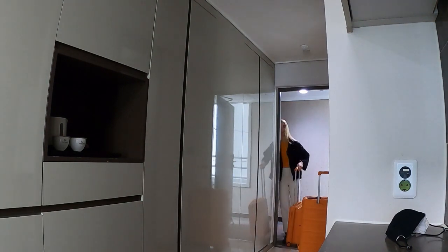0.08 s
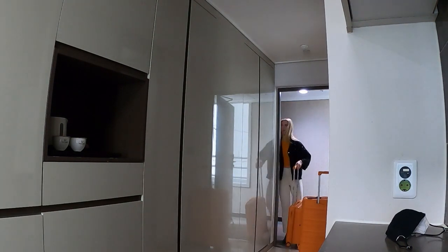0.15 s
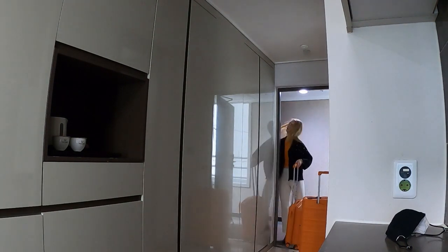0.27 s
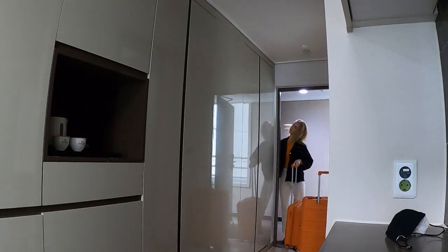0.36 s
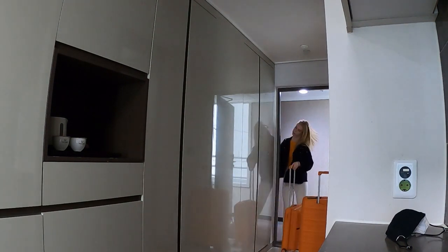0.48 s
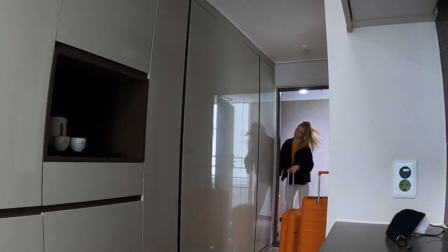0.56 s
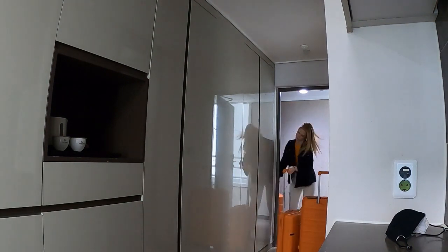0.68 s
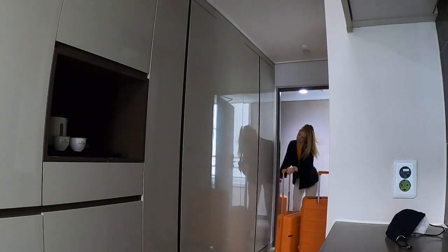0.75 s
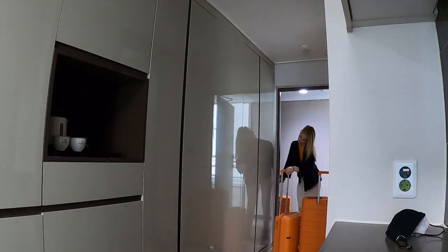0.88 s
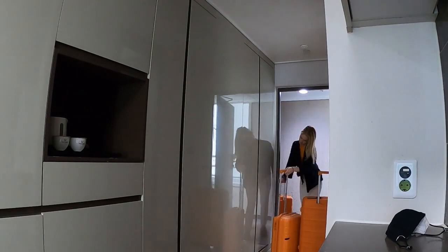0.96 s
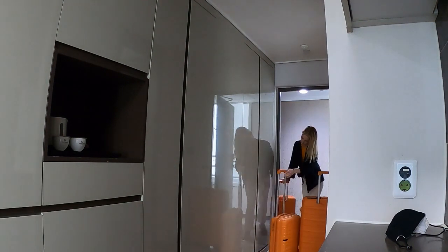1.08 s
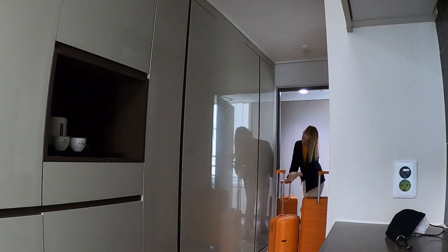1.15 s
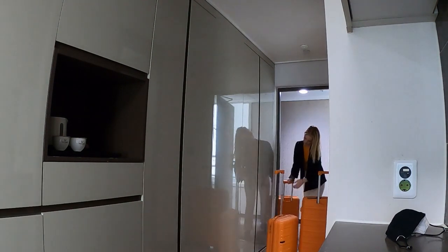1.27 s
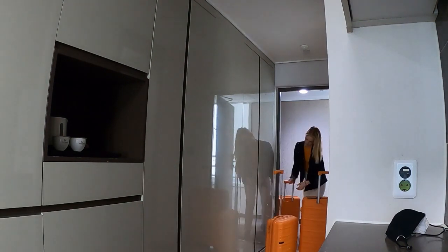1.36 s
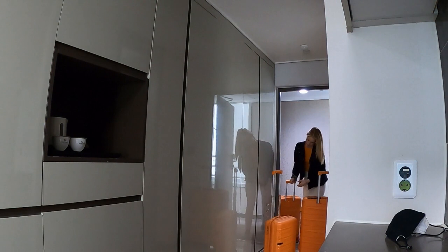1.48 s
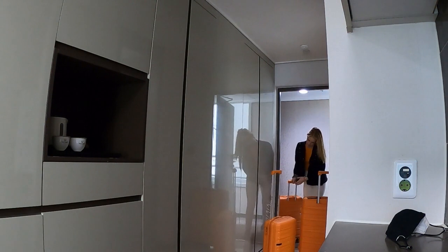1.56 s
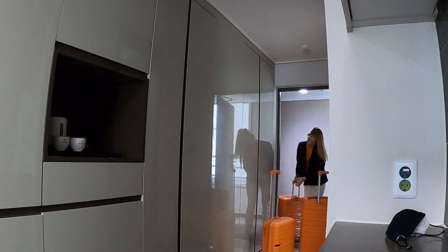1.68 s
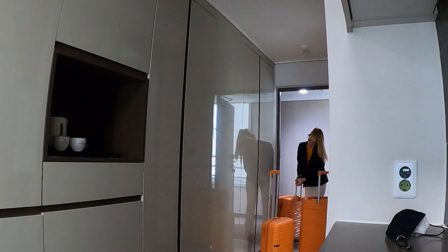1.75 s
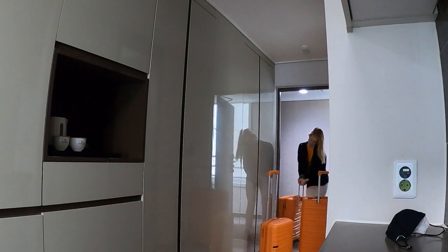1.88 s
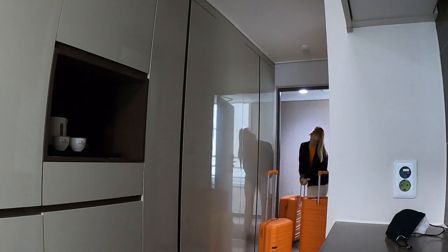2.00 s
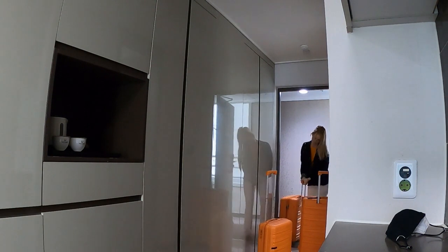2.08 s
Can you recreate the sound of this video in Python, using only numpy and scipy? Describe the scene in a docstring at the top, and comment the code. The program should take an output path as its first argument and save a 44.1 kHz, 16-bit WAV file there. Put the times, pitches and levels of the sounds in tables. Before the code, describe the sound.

Hard-shell suitcases clatter twice over a door sill, then roll on quietly with soft steps.

```python
"""A small, bare hallway, into which hard-shell suitcases are pulled over a door sill.
The wheels drop off the sill in two clattering bangs, and a handle clacks home: each impact makes
loose fittings rattle and excites the resonances of the hollow shells and of the room.
Then the cases roll on quietly, with soft steps, light knocks, zip clicks and a swish of cloth."""
import sys
import numpy as np
from scipy import signal
from scipy.fft import rfft, irfft
from scipy.io import wavfile
from scipy.ndimage import uniform_filter1d

SR = 44100
rng = np.random.default_rng(int(sys.argv[2]) if len(sys.argv) > 2 else 0)


def log_audio(samples):
    """Write samples as a 16-bit WAV file to the path given in sys.argv[1]."""
    # one column per channel
    frames = np.atleast_2d(samples).T
    # limit to full scale, then quantise
    limited = np.clip(frames, -1, 1)
    pcm = np.round(limited * 32767).astype(np.int16)
    wavfile.write(sys.argv[1], SR, pcm)


N = 92610
T = np.arange(N) / SR
RESPONSE_SAMPLES = 2 ** 15
SIDES = np.array([[1], [-1]])   # a side signal adds on the left and subtracts on the right

# Impacts of the first bang, the second bang and the handle.
# Each row: start in seconds, then relative levels of thump, knock and clack in dB.
HEAVY_IMPACTS = [(.2005, -10, -15.5, -3.5), (.2131, -5, -16, -5), (.2235, 2, 2, -3.5),
                 (.2443, -10, -2, -13.5), (.2595, -7, -7.5, -10), (.2708, -5, -5, -1.5),
                 (.2855, -3.5, -4.5, -2)]
LIGHT_IMPACTS = [(.6855, -10, -19.5, -16.5), (.6925, -1, -5.5, -3.5), (.7012, 2.5, -1.5, 0.5),
                 (.7125, 2.5, 1, -4.5), (.7335, -3, -3.5, -4), (.7495, -10, -15, -7.5)]
HANDLE_IMPACTS = [(.792, -29, -12, -5.5), (.804, -4.5, 0.5, -0.5), (.8155, -8.5, -3, -7),
                  (.852, -9.5, -8, -12.5), (.89, -19.5, -17, -10)]


def from_db(db):
    """Amplitude grows tenfold for every 20 dB."""
    return 10 ** (np.asarray(db) / 20)


def rms_one(x):
    """Normalisation to unit mean power."""
    return x / np.sqrt(np.mean(x ** 2) + 1e-20)


def at_hz(points, hz):
    """Interpolation along a logarithmic frequency axis."""
    frequencies, values = np.transpose(points)
    return np.interp(np.log(hz), np.log(frequencies), values)


def level(curve):
    """Amplitude envelope through points of time in seconds and level in dB."""
    return from_db(np.interp(T, *np.transpose(curve)))


def coloured(x, spectrum, size=4096):
    """Minimum-phase filtering: folding the cepstrum makes the response causal."""
    hz = np.maximum(np.arange(size // 2 + 1) * SR / size, 1)
    cepstrum = irfft(np.log(from_db(at_hz(spectrum, hz))))
    cepstrum[1:size // 2] *= 2
    cepstrum[size // 2 + 1:] = 0
    return signal.fftconvolve(x, irfft(np.exp(rfft(cepstrum))))[:len(x)]


def hiss(spectrum):
    """Filtered Gaussian noise of unit power."""
    return rms_one(coloured(rng.standard_normal(N), spectrum))


def add(track, start_s, sound):
    """Superposition: a sound adds to the track from its start time on."""
    i = int(max(start_s, 0) * SR)
    track[i:i + len(sound)] += sound[:max(N - i, 0)]


def mode(x, hz, t60):
    """Damped oscillator: a unit impulse rings as a sine that falls 60 dB in t60 seconds."""
    radius = from_db(-60 / (t60 * SR))
    angle = 2 * np.pi * hz / SR
    return signal.lfilter([0, np.sin(angle)], [1, -2 * radius * np.cos(angle), radius ** 2], x + 1e-18)


def ringing(strikes, modes):
    """Modal superposition: every strike excites all the modes, scaled by its first level."""
    impulses = np.zeros(N)
    for start, db, *_ in strikes:
        add(impulses, start, from_db([db]))
    return sum(from_db(db) * mode(impulses, hz, t60) for hz, db, t60 in modes)


def contact(size=4096, per_s=900, decay_s=.0085, chatter_db=-4.5):
    """Contact chatter: one impulse, then dying random rebounds of loose parts, with unit energy in all."""
    rebounds = (rng.random(size) < per_s / SR) * rng.standard_normal(size)
    force = rebounds * np.exp(-T[:size] / decay_s) * from_db(chatter_db)
    force[0] = 1
    return force / np.sqrt(np.sum(force ** 2))


def scuff(size=4096, per_s=2300, decay_s=.019):
    """Stick-slip friction: a light touch is a dying run of tiny slips, with unit energy in all."""
    slips = (rng.random(size) < per_s / SR) * rng.choice([-1, 1], size)
    force = slips * np.exp(-T[:size] / decay_s)
    return force / np.sqrt(np.sum(force ** 2) + 1e-18)


def blows(impacts, spectrum, touch=contact):
    """Source and filter: each contact has its own balance of three bands; the case colours them all."""
    bands_hz = [200, 830, 3070]   # centres of thump, knock and clack
    force = np.zeros(N)
    for start, *levels_db in impacts:
        add(force, start, coloured(touch(), list(zip(bands_hz, levels_db))))
    return coloured(force, spectrum)


def taps(contacts, spectrum):
    """Source and filter: rattling contacts of different strengths share one spectrum."""
    force = np.zeros(N)
    for start, db in contacts:
        add(force, start, from_db(db) * contact())
    return coloured(force, spectrum)


def hallway_tone(level_db=-58):
    """Steady background noise: an independent side signal makes the channels partly coherent."""
    # Spectrum, and further filter for the side signal. Each row: frequency in Hz, gain in dB.
    spectrum = [(20, -9), (60, -1), (140, 4), (400, -12), (1000, -14), (3000, -25.5), (9000, -40.5),
                (15000, -76.5)]
    side_filter = [(30, 0), (125, -2.5), (1000, -8.5), (6000, -3.5)]
    return from_db(level_db) * (hiss(spectrum) + coloured(hiss(spectrum), side_filter) * SIDES)


def standing_waves():
    """Impulse response of the hallway's low normal modes, summed with alternating signs."""
    # Each row: frequency in Hz, gain at resonance in dB, 60 dB decay time in seconds.
    room_modes = [(82.4, 1, 0.33), (108.5, 6, 0.39), (140.7, 6, 0.45), (161.2, 5.5, 0.46),
                  (193.6, 10.5, 0.27), (257.6, 2.5, 0.25), (290.1, 5.5, 0.5), (303.7, 0.5, 0.12),
                  (344.2, 1.5, 0.12), (384.2, -7, 0.12), (413.3, 5, 0.36), (430, 1.5, 0.4),
                  (479.5, 4.5, 0.69)]
    impulse = signal.unit_impulse(RESPONSE_SAMPLES)
    response = 0
    for k, (hz, db, t60) in enumerate(room_modes):
        resonant_gain = t60 * SR / (2 * np.log(1000))
        response += (-1) ** k * from_db(db) / resonant_gain * mode(impulse, hz, t60)
    return response


def power_decay(energy_db, t60):
    """Exponential decay of reverberant power with a given total energy."""
    power = from_db(-120 * T[:RESPONSE_SAMPLES] / t60)
    return from_db(energy_db) ** 2 * power / power.sum()


def hallway(bands=20):
    """Stereo impulse response from one spot: direct sound, early reflections and a diffuse tail."""
    # Each row: frequency in Hz, reverberation time in seconds.
    reverb_times = [(60, 0.74), (160, 0.2), (420, 0.68), (1100, 0.5257), (2900, 0.3672), (7700, 0.35),
                    (14000, 0.5)]
    # Strength of the reflections, and of their side signal. Each row: frequency in Hz, gain in dB.
    scattering = [(70, -6.5), (150, -2.5), (350, -2), (600, 0)]
    side_gains = [(30, -9), (125, -51), (250, -29), (500, -15), (1000, -12.5), (2000, -7), (4000, -5.5),
                  (8000, -0.5), (14000, -4)]
    bin_hz = np.maximum(np.arange(RESPONSE_SAMPLES // 2 + 1) * SR / RESPONSE_SAMPLES, 1)
    centres = np.geomspace(30, 16000, bands)
    white = rfft(rng.standard_normal((2, RESPONSE_SAMPLES)))
    response = np.zeros((2, RESPONSE_SAMPLES))
    early = power_decay(-3.5, t60=.049)
    for hz, selector in zip(centres, np.eye(bands)):
        band = np.interp(np.log(bin_hz), np.log(centres), selector)
        noise = irfft(white * band)
        # Evening out the short-term power lets each band decay smoothly.
        local_power = uniform_filter1d(noise ** 2, int(SR * (.006 + 6 / hz)), axis=1)
        mid, side = noise * np.sqrt(np.mean(band ** 2) / (np.abs(local_power) + 1e-18))
        late = power_decay(-1, t60=at_hz(reverb_times, hz))
        amplitude = from_db(at_hz(scattering, hz)) * np.sqrt(early + late)
        response += amplitude * (mid + from_db(at_hz(side_gains, hz)) * side * SIDES)
    response[:, 0] += from_db(-9)   # direct sound
    return response


def cloth_swish():
    """Friction noise swells and fades as cloth brushes the cases."""
    levels = [(0, -66), (.15, -92), (.65, -95), (1.08, -70), (1.2, -63.5), (1.29, -69.5), (1.38, -86),
              (1.55, -79.5), (1.6, -77.5), (1.68, -89), (1.86, -73), (1.95, -69.5), (2.1, -73)]   # Each row: time in seconds, level in dB.
    spectrum = [(200, -45.5), (1500, -1), (3200, -0.5), (5500, -2.5), (9500, -12.5), (13000, -23.5),
                (16000, -19)]   # Each row: frequency in Hz, relative level in dB.
    return level(levels) * hiss(spectrum)


def wheels(bumps_per_s=500, spread_db=2.5):
    """Roughness excitation: small wheels patter over the grain of the floor."""
    levels = [(0, -60), (.18, -66.5), (.4, -53), (.62, -50.5), (1.0, -51), (1.22, -61), (1.48, -65),
              (1.6, -55.5), (1.8, -64.5), (1.95, -61), (2.1, -67)]   # Each row: time in seconds, level in dB.
    spectrum = [(25, -19.5), (70, -20.5), (140, 1.5), (230, -0.5), (450, -0.5), (750, -18.5), (1150, -5.5),
                (1900, -33), (3200, -51), (6000, -59.5), (15000, -75.5)]   # Each row: frequency in Hz, relative level in dB.
    bumps = (rng.random(N) < bumps_per_s / SR) * rng.choice([-1, 1], N)
    strengths = from_db(spread_db * rng.standard_normal(N))
    return level(levels) * rms_one(coloured(bumps * strengths, spectrum))


def footsteps():
    """Soft impacts put most of their energy into low frequencies."""
    footfalls = [(1.035, -6), (1.35, 6), (1.44, -4.5), (1.54, -1.5), (1.70, -5)]   # Each row: start in seconds, relative level in dB.
    spectrum = [(25, -39), (70, -32), (135, -18), (250, -34.5), (500, -35), (900, -47), (3000, -67),
                (15000, -100)]   # Each row: frequency in Hz, gain in dB.
    return taps(footfalls, spectrum)


def zip_pulls():
    """Brief contacts of small, hard parts radiate mainly treble."""
    clicks = [(1.21, -4), (1.272, 2), (1.415, -15.5), (1.704, 0.5), (1.881, -8), (1.935, -11)]   # Each row: start in seconds, relative level in dB.
    spectrum = [(300, -89), (2000, -49.5), (4500, -50), (7000, -55.5), (9000, -51.5), (11000, -67),
                (15000, -75)]   # Each row: frequency in Hz, gain in dB.
    return taps(clicks, spectrum)


def light_knocks():
    """Friction spreads each light touch of a handle or wheel into a short scuff."""
    # Each row: start in seconds, then relative levels of thump, knock and clack in dB.
    touches = [(.008, -23, -18.5, -12), (1.022, -14, -38, 2.5), (1.058, -7.5, 3.5, -5.5),
               (1.315, -4, 0, -6), (1.333, 2.5, 0, -5), (1.522, -2, -6, -22.5), (1.548, -1.5, -13, -24.5),
               (1.706, -4, -6.5, -26), (1.725, -12, -8, -18), (1.879, -4, -2.5, -8),
               (1.897, -2, -15.5, -22), (2.06, -10.5, -20, -10.5)]
    spectrum = [(30, -33.5), (130, -26.5), (300, -22.5), (750, -34.5), (1250, -29), (2000, -35),
                (3200, -38.5), (5000, -49), (9000, -67), (15000, -102)]   # Each row: frequency in Hz, gain in dB.
    return blows(touches, spectrum, scuff)


def fittings():
    """Free vibration: plastic and metal fittings snap against their stops and ring in one mode each."""
    # Each row: start in seconds, frequency in Hz, relative level in dB, 60 dB decay time in seconds.
    snaps = [(.2005, 3610, -16.5, 0.016), (0.2018, 1380, -22.5, 0.043), (0.379, 950, -28.5, 0.046),
             (.7008, 2690, -2.5, 0.0052), (.722, 1119, -21.5, .05), (.73, 13700, -63, .3),
             (.8035, 2923, -18, 0.033), (.805, 3226, -21.5, .025), (.806, 662, -24.5, 0.06),
             (.845, 7980, -45, 0.05), (.887, 3200, -30, 0.021), (.925, 3330, -29, 0.019)]
    sound = 0
    for start, hz, db, t60 in snaps:
        treble_cut = signal.butter(2, min(1.6 * hz, .45 * SR), fs=SR, output="sos")
        sound += signal.sosfilt(treble_cut, ringing([(start, db)], [(hz, 0, t60)]))
    return sound


def shell_ring(heavy_db=3, light_db=-15):
    """Resonance: the thumps of both bangs and of the handle excite the modes of the hollow shells."""
    # Each row: frequency in Hz, relative level in dB, 60 dB decay time in seconds.
    shell_modes = [(500, -38, 0.14), (590, -36.5, 0.9), (674, -51, 0.17), (797, -41.5, 0.24),
                   (943, -42, 0.25), (974, -39, 0.29), (1157, -51, 0.35), (1182, -38, 0.38)]
    heavy = from_db(heavy_db) * ringing(HEAVY_IMPACTS, shell_modes)
    light = from_db(light_db) * ringing(LIGHT_IMPACTS + HANDLE_IMPACTS, shell_modes)
    return heavy + light


def handle_clack(gain_db=27):
    """Inelastic rebound: a handle clacks home and bounces with fading strength."""
    spectrum = [(25, -17), (80, -14.5), (190, -1.5), (300, -11.5), (430, -4.5), (530, -13.5), (665, -4.5),
                (780, -13), (1000, -7.5), (1800, -17.5), (2500, -18.5), (2950, -15), (3500, -13),
                (4200, -25), (5500, -32.5), (7200, -39.5), (8700, -39.5), (15000, -65)]   # Each row: frequency in Hz, gain in dB.
    return from_db(gain_db) * blows(HANDLE_IMPACTS, spectrum)


def sill_bangs(heavy_db=28.5, light_db=26):
    """Impact excitation: wheels land on alternate sides of a case, giving two tracks for each bang."""
    # Spectra of the hollow first bang and the lighter second. Each row: frequency in Hz, gain in dB.
    heavy_spectrum = [(20, -36), (36, -6), (70, -8.5), (110, 0), (190, 0), (228, -0.5), (330, 7.5),
                      (450, 0.5), (730, -6), (860, -4), (1300, -10), (1900, -14.5), (2400, -20),
                      (2850, -14.5), (3600, -18.5), (4400, -31.5), (5600, -30), (7200, -41.5),
                      (8900, -42.5), (15000, -65)]
    light_spectrum = [(20, -35), (36, -10), (80, -14.5), (140, -6.5), (190, -2), (225, -7.5), (265, 2),
                      (370, -13.5), (560, -4.5), (740, -14), (1080, -6.5), (1850, -16), (2850, -15),
                      (3600, -14), (4400, -27), (5800, -29), (7400, -40.5), (8900, -40), (15000, -72)]
    heavy = [from_db(heavy_db) * blows(HEAVY_IMPACTS[side::2], heavy_spectrum) for side in range(2)]
    light = [from_db(light_db) * blows(LIGHT_IMPACTS[side::2], light_spectrum) for side in range(2)]
    return heavy + light


def scene():
    """Convolution gives each spot its own reflections and the shared room modes; the shell ring is dry."""
    spots = sill_bangs() + [handle_clack()]
    small_sounds = from_db(25) * (light_knocks() + zip_pulls() + footsteps())
    spots.append(fittings() + small_sounds + wheels() + cloth_swish())
    boom = standing_waves()
    in_room = sum(signal.fftconvolve(spot[None], hallway() + boom, axes=1)[:, :N] for spot in spots)
    return in_room + shell_ring() + hallway_tone()


def record(dry, cutoff_hz=16000):
    """Time and level cues: the right microphone is a little nearer and brighter; both are low-passed."""
    balance = [(250, -.5), (1000, -0.5), (2200, 1), (4000, 1), (8000, -3), (14000, -6.5)]   # Each row: frequency in Hz, left level minus right level in dB.
    left = coloured(dry[0], [(hz, db / 2) for hz, db in balance])
    left = signal.lfilter([.4, 1], [1, .4], left)   # all-pass: about half a sample of lag
    right = coloured(dry[1], [(hz, -db / 2) for hz, db in balance])
    treble_cut = signal.cheby2(12, 70, cutoff_hz, fs=SR, output="sos")
    return signal.sosfilt(treble_cut, np.array([left, right]))


dry = scene()
out = record(dry)
log_audio(out)
```